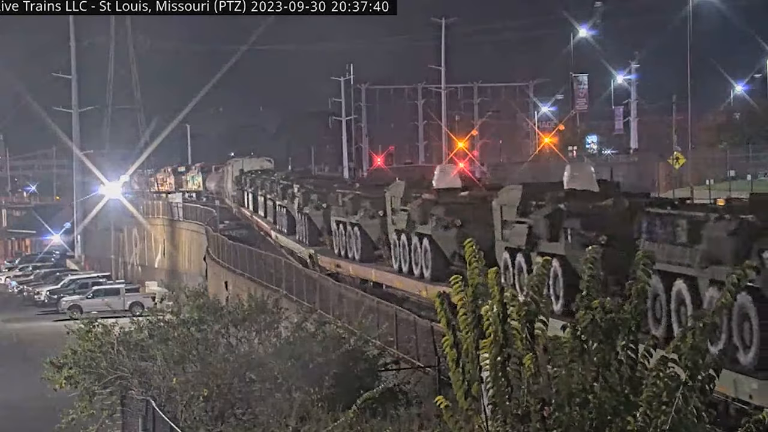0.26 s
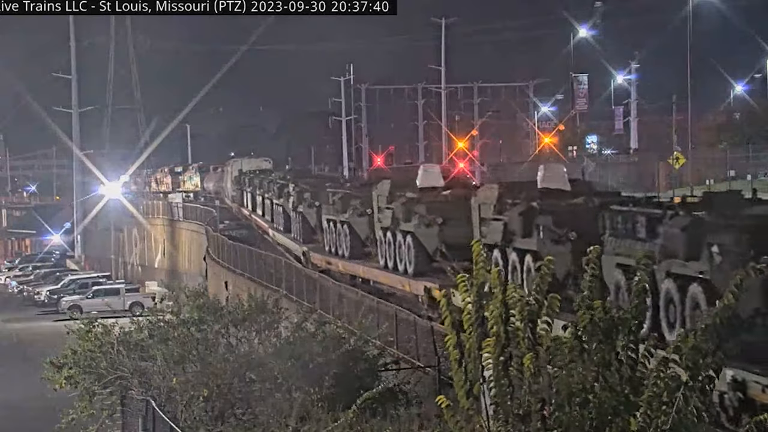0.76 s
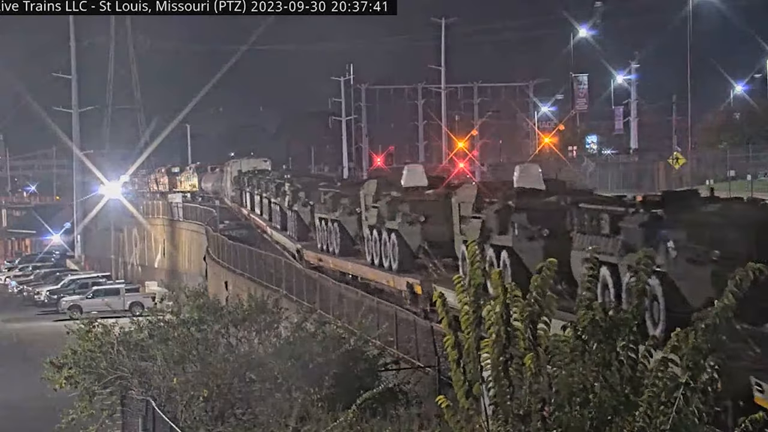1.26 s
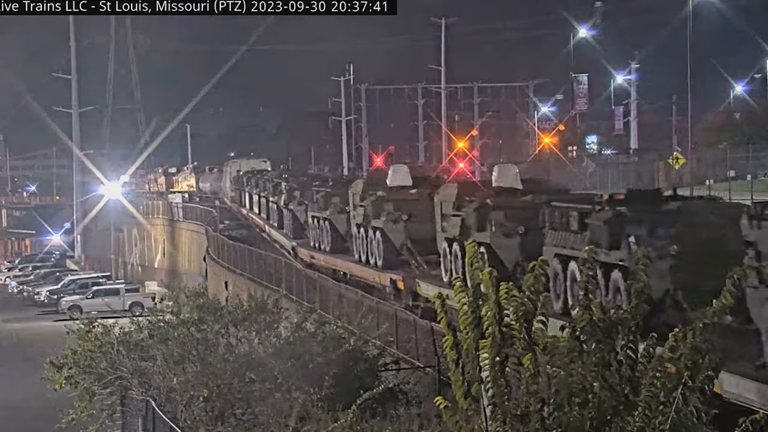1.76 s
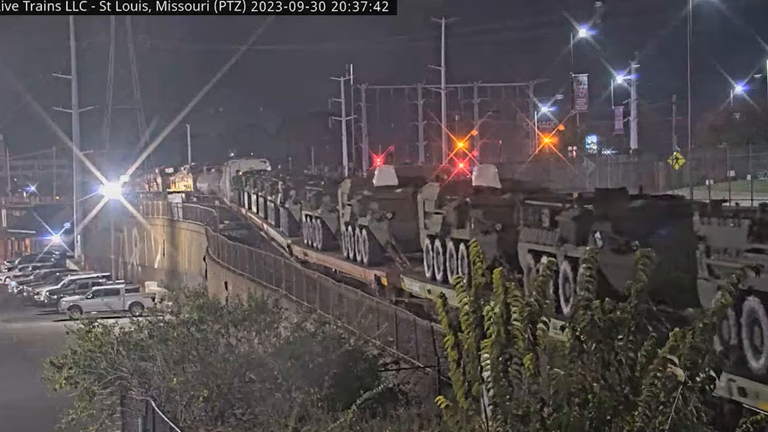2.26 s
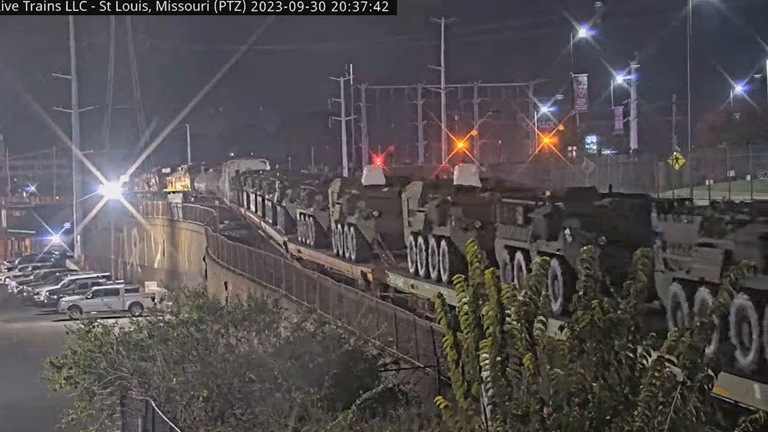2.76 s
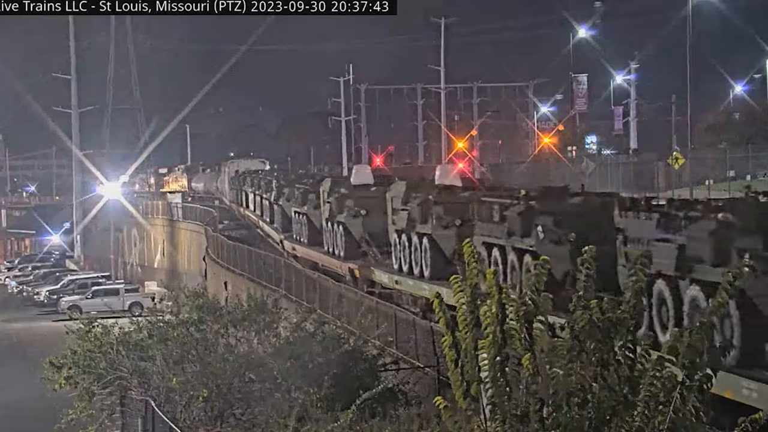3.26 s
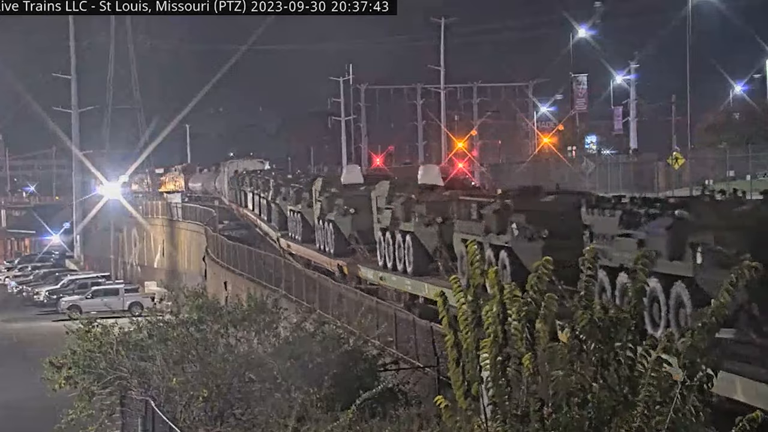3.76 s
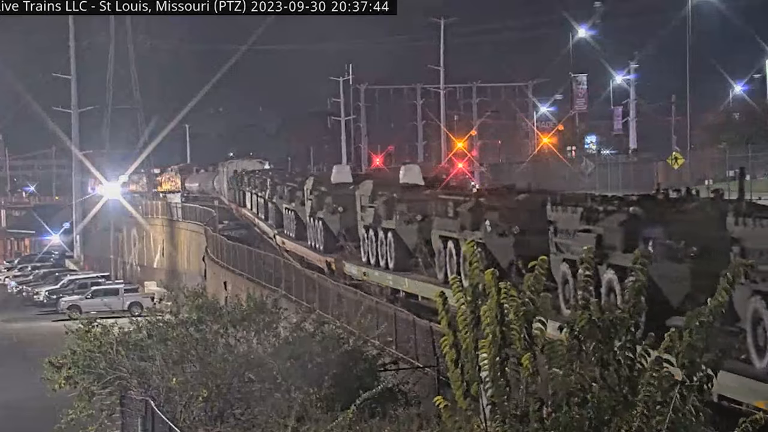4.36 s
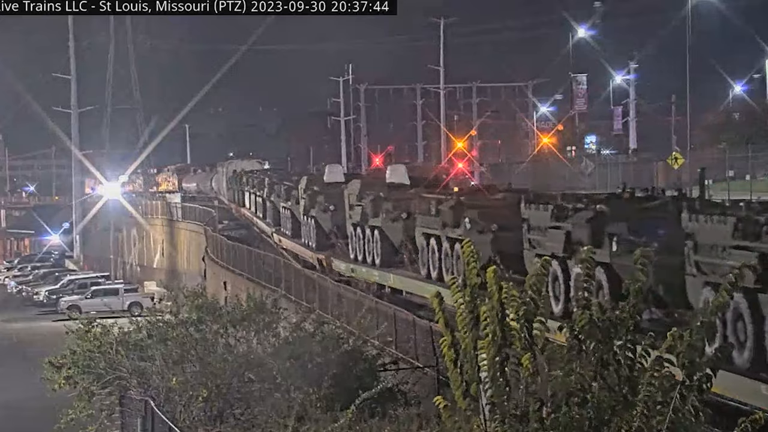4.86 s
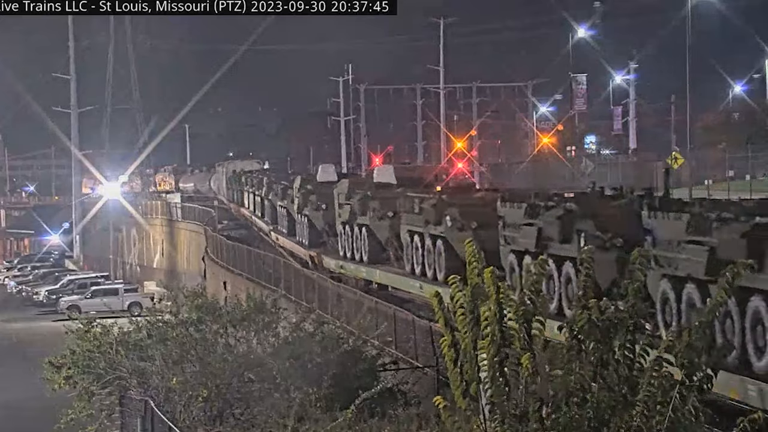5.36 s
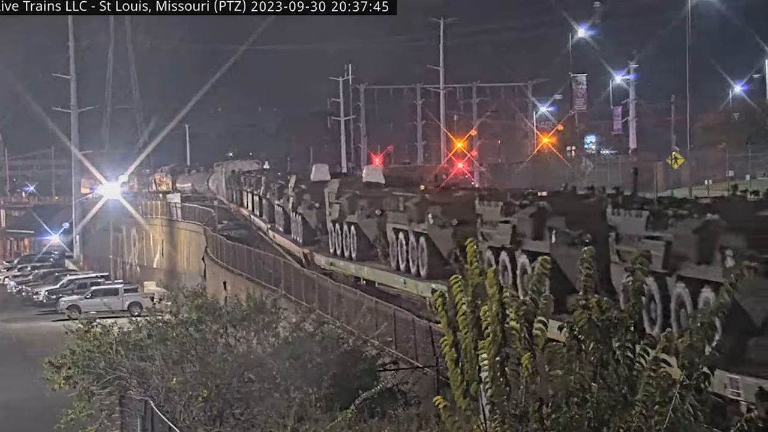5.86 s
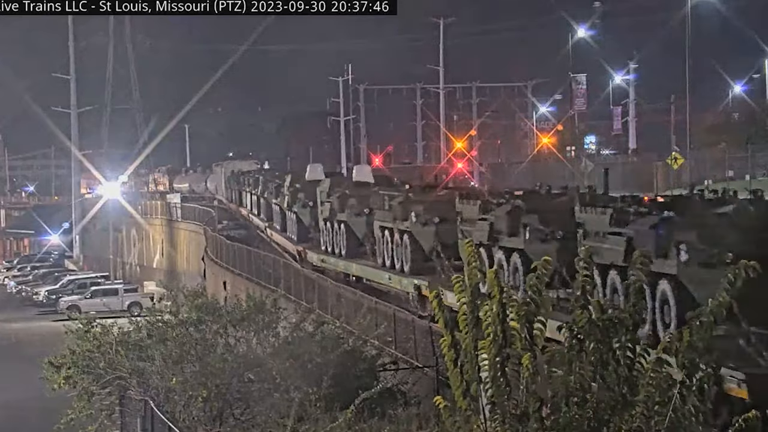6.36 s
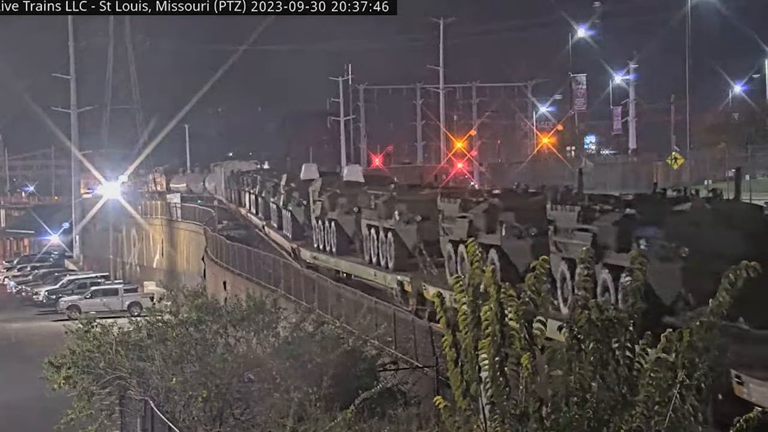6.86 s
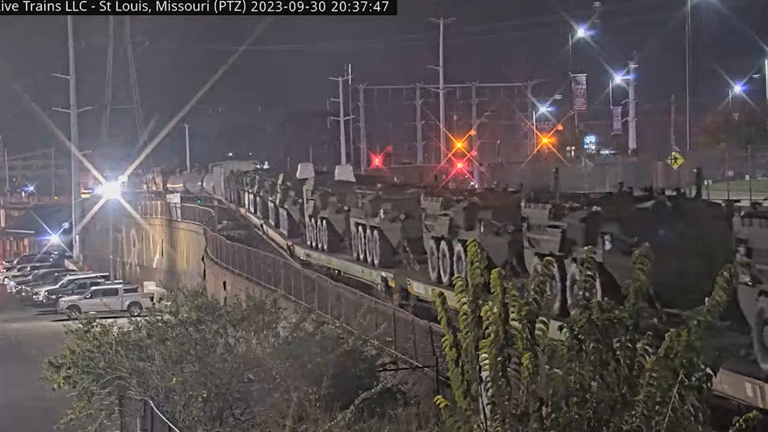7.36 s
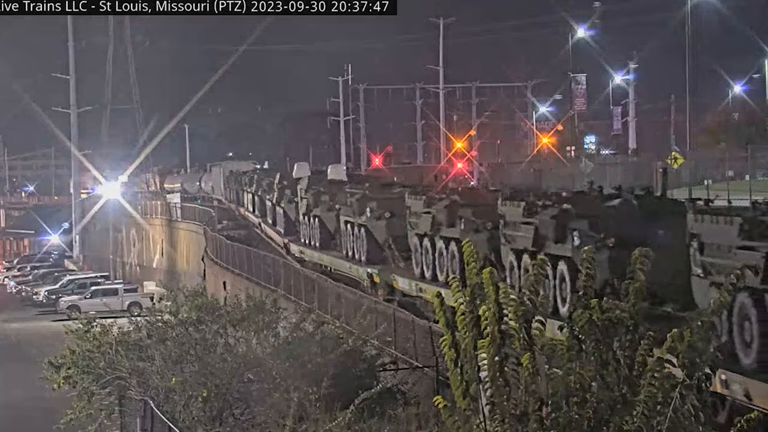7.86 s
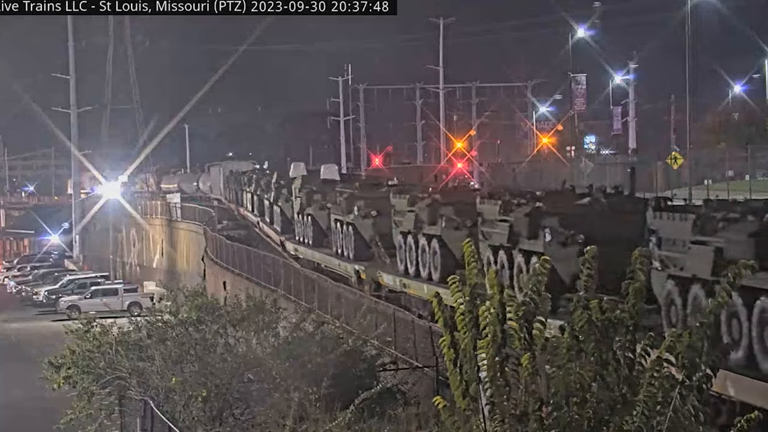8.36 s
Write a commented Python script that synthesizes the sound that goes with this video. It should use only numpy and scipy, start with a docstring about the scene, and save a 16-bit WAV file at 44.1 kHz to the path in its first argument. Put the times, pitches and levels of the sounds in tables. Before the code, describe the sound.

A passing freight train's wheels screech in several high, wavering tones, with steel grinding and low rumble, until the squeal dies away.

```python
"""On a railway curve at night, a long freight train of loaded flatcars rolls past a distant microphone.
Many wheels squeal at once, each ringing with its own notes, while their flanges (the lips that keep
them on the track) scrape the rail. Below lie the rumble of rolling and a few knocks from the cars.
Near the end the flanges press less hard, and the squeal and scrape die away."""
import sys
import numpy as np
from scipy import signal
from scipy.fft import rfft, irfft, next_fast_len
from scipy.io import wavfile
from scipy.ndimage import uniform_filter1d

SR = 44100
rng = np.random.default_rng(int(sys.argv[2]) if len(sys.argv) > 2 else 0)


def bounce(signal):
    """Save signal as a 16-bit WAV file at the path given by the first command-line argument."""
    frames = np.transpose(np.atleast_2d(signal))
    limited = np.clip(frames, -1, 1)
    pcm = np.round(limited * 32767).astype(np.int16)
    wavfile.write(sys.argv[1], SR, pcm)


N = 380122
TIME, FREQS = np.arange(N) / SR, np.fft.rfftfreq(N, 1 / SR)


def amp(db):
    """Turns decibels into a gain to multiply by."""
    return 10 ** (np.asarray(db) / 20)


def evened(x):
    """Scales a signal to an average power of one."""
    return x / np.sqrt(np.mean(x ** 2) + 1e-20)


def ringing(modes):
    """Gain at every frequency for a body with these modes (the notes it likes to ring at)."""
    power = sum(amp(db) ** 2 / (1 + 2 * ((FREQS - hz) / width) ** 2) ** 2 for hz, width, db in modes)
    return np.sqrt(power)


def noise(gain):
    """Random vibration, shaped by a gain for every frequency."""
    size = next_fast_len(N)
    shape = np.interp(np.fft.rfftfreq(size, 1 / SR), FREQS, gain)
    return evened(irfft(rfft(rng.standard_normal(size)) * shape, size)[:N])


def drift(per_s, count=2048):
    """A smooth random wobble, about one in size, that swings up to about per_s times a second."""
    hz = np.fft.rfftfreq(count, TIME[-1] / count)
    slow = irfft(rfft(rng.standard_normal(count)) / (1 + (hz / per_s) ** 4))
    return np.interp(TIME, np.linspace(0, TIME[-1], count), evened(slow))


def swell(start, length, edge_s):
    """Rises from 0 to 1 around the start, holds, and falls back around the end."""
    return np.clip(.5 + np.minimum(TIME - start, start + length - TIME) / edge_s, 0, 1)


def echoes(x, fade_s, echo_db):
    """Walls and cars scatter the sound into echoes that fall by 60 dB in fade_s."""
    taps = rng.choice([-1., 1.], SR) * (rng.random(SR) < 1 / 20)
    taps *= amp(-60 * TIME[:SR] / fade_s)
    tail = signal.oaconvolve(x, taps / np.linalg.norm(taps))[:N]
    return (x + amp(echo_db) * tail) / np.hypot(1, amp(echo_db))


def flange_push(db, follow, db_per_s):
    """Gain of a sound that follows the flanges' push on the rail and shifts steadily with time."""
    # how hard the flanges press in the curve: t/s, force/dB
    push = [(0, -3), (0.35, -1), (0.7, -3.5), (1.25, -6), (1.9, -6.5), (2.45, -9), (2.8, -7.0), (3.7, -8),
            (4.05, -11), (4.7, -12), (5.6, -10.5), (6.8, -9.5), (7.3, -11.0), (7.8, -17), (8.1, -22.5),
            (8.62, -27)]
    # a flange bites and the steel briefly sounds louder: t/s, length/s, extra force/dB
    bites = [(1.367, 0.083, 2), (2.022, 0.15, 1.5), (5.944, 0.14, 3)]
    force_db = np.interp(TIME, *np.transpose(push))
    force_db += sum(extra * swell(start, length, edge_s=0.04) for start, length, extra in bites)
    return amp(db + follow * force_db + db_per_s * TIME)


def wheel_note(hz, spread_hz, waver=0.002017, grab_db=4.5, slip=0.49, doppler=.004, wheels=4):
    """One note on several wheels; each wavers in pitch, grabs the rail and lets go."""
    tones = np.zeros(N)
    centre = hz * (1 + doppler * (.5 - TIME / TIME[-1]))  # the pitch sinks a little as the wheels pass
    for _ in range(wheels):
        pitch = centre * (1 + waver * drift(82.5)) + spread_hz * drift(18)
        grip = amp(grab_db * drift(12))
        tones += grip * np.sin(2 * np.pi * (np.cumsum(pitch) / SR + rng.random()))
    note = evened(echoes(tones, fade_s=0.6, echo_db=0.5))
    note += slip * noise(ringing([(hz, 3.3 * spread_hz, 0)]))  # sliding rings the same note loosely
    power = uniform_filter1d(note ** 2, size=4500)
    return note / np.sqrt(power + 1e-12)  # the wheels share one drive, so their total stays steady


def squeal(follow=0.97):
    """The wheels ring louder the harder the flanges press, and single notes flare up."""
    # the wheels' notes: f/Hz, spread among wheels/Hz, base level/dB, change/(dB/s)
    notes = [(2771, 13.86, -34, -1.4), (3540, 22, -45.5, -1.0), (4455, 30, -33.5, 0.11),
             (5358, 35, -24.5, -0.39), (6277, 34, -35, 0.15), (7210, 45, -41, 0.4),
             (8117, 36, -39.5, -0.68), (9055, 42, -44, -0.75), (10866, 45, -57, -0.74)]
    # a wheel locks into one note, which flares: t/s, length/s, rise and fall/s, f/Hz, boost/dB
    flares = [(0.0, 0.2, 0.12, 5358, 6.5), (0.0, 0.23, 0.05, 4458, 5), (0.0, 0.37, 0.1, 8128, 5),
              (0.2, 4.8, 0.11, 6284, 7), (0.248, 0.11, 0.026, 2775, 7), (0.404, 0.076, 0.029, 2775, 10),
              (0.33, 0.7, 0.1, 3540, 10), (0.38, 0.42, 0.082, 7225, 7), (0.4, 3.2, 0.7, 10890, 13),
              (0.85, 0.84, 0.16, 6284, 3.5), (0.85, 0.45, 0.3, 9070, 5.5), (1.25, 0.53, 0.12, 8128, 5),
              (2.253, 0.12, 0.06, 2775, 5.5), (2.3, 0.41, 0.25, 9070, 8), (2.977, 0.16, 0.06, 2775, 3.5),
              (3.303, 0.93, 0.25, 7225, 5.5), (3.4, 0.49, 0.15, 4458, 4), (3.7, 1.4, 0.4, 9070, 8.5),
              (4.95, 0.55, 0.15, 7225, 4.5), (5.65, 1.9, 0.35, 4458, 4), (6.6, 0.35, 0.15, 8128, 3),
              (6.996, 0.095, 0.06, 4458, 8.5)]
    pitches = np.transpose(notes)[0]
    boosts = np.zeros((len(notes), N))
    for start, length, edge_s, hz, db in flares:
        nearest = np.argmin(abs(pitches - hz))
        boosts[nearest] += db * swell(start, length, edge_s)
    return sum(flange_push(db + boost, follow, db_per_s) * wheel_note(hz, spread)
               for (hz, spread, db, db_per_s), boost in zip(notes, boosts))


def rub(loudness, modes, patchy_db=1.2):
    """Sliding steel rings a set of modes, in two groups that swell and fade separately."""
    groups = ringing(modes[::2]), ringing(modes[1::2])
    rubbing = sum(np.linalg.norm(gain) * noise(gain) * amp(patchy_db * drift(13.7)) for gain in groups)
    return flange_push(*loudness) * evened(rubbing)


def scrape(next_car_s=4.87, rise_s=0.099, judder_db=0.24):
    """Flanges, rail and grit grind together, joined later by the next car; one shaky grip moves all."""
    # loudness of each part: base level/dB, dB per dB of force, change/(dB/s)
    flange = (-22, 0.95, 0.02)  # flange against the top of the rail
    rail = (-33.5, 0.75, 0.087)  # ringing rail and wheel frames
    grit = (-48, 0.71, -0.66)  # fine grit between wheel and rail
    next_car = (-26.5, 1.0, -0.056)  # its wheels are tuned a little differently
    # where each part rings: f/Hz, width/Hz, relative level/dB
    flange_modes = [(4456, 160, 0), (4720, 690, -5), (5280, 214, 3), (5544, 176, 4), (5820, 750, 0),
                    (6280, 180, -9), (6800, 260, -11.5), (7230, 400, -10.5), (7830, 220, -22),
                    (8007, 660, -17)]
    rail_modes = [(352, 174, -8.5), (705, 1120, -14), (1332, 110, -10.5), (1578, 200, -7), (1830, 128, 0.5),
                  (1996, 110, -4), (2213, 160, -0.5), (2730, 325, 3), (3090, 89, 0), (3257, 90, 3),
                  (3517, 135, 6), (3847, 240, 4), (4100, 240, -12.5)]
    grit_modes = [(9077, 2200, -1), (9800, 130, 4), (10570, 301, 0.5), (11650, 306, 1), (12566, 190, -13),
                  (13683, 584, -18)]
    next_car_modes = [(955, 53, -17), (2213, 54, -6.5), (2600, 140, -4.5), (5540, 82, 4.5),
                      (6220, 120, -3.5), (6390, 126, 5), (6950, 44, -3.5), (7310, 170, -5),
                      (8330, 150, -18), (10300, 2900, -30.5), (11900, 343, -32)]
    steel = rub(flange, flange_modes) + rub(rail, rail_modes) + rub(grit, grit_modes)
    arrival = np.clip((TIME - next_car_s) / rise_s, 0, 1)
    steel += arrival * rub(next_car, next_car_modes)
    return steel * amp(judder_db * drift(40))


def moving_echoes(x, places=14):
    """The echo paths keep changing as the cars move along, each fading into the next."""
    times = np.linspace(0, TIME[-1], places)
    fades = (np.interp(TIME, times, here) for here in np.eye(places))
    return sum(echoes(x * fade, fade_s=0.18, echo_db=-7) for fade in fades)


def rumble(lumpy_db=0.83):
    """Heavy wheels roll over uneven rail."""
    # loudness from the weight of the rolling cars: t/s, level/dB
    weight = [(0.0, -39), (1.3, -40), (2.3, -42.5), (4.4, -41), (6.2, -44), (8.62, -43)]
    # the rumble's deep tone: f/Hz, relative level/dB
    tone = [(15, -3), (30, -2), (40, -2), (52, 3), (75, -4), (115, -6.5), (150, -11.5), (230, -18.5),
            (350, -21.5), (600, -27.5), (980, -26), (1200, -31.5), (1600, -29.5), (12000, -55)]
    hz, db = np.transpose(tone)
    spectrum = amp(np.interp(np.log(FREQS + 1), np.log(hz), db))
    level_db = np.interp(TIME, *np.transpose(weight)) + lumpy_db * drift(14.0)
    return amp(level_db) * noise(spectrum)


def knocks(rise_s=0.0012, decay_s=0.041, boost_db=1):
    """Each blow sets off a short ring of steel, a thud of the car's deck and a thin clatter."""
    # couplers and decks knock: t/s, level before the boost/dB, f/Hz
    blows = [(2.57, -45.5, 1120), (4.145, -54, 400), (4.36, -49.5, 1060), (4.61, -51, 348),
             (4.915, -47, 398), (5.333, -51, 450), (5.534, -51, 520), (5.60, -47, 635), (6.02, -50, 1000),
             (6.33, -39, 340), (6.457, -50, 392), (6.59, -48.5, 610), (7.086, -49, 1030),
             (7.734, -46.5, 370), (8.369, -45.5, 343)]
    out = np.zeros(N)
    for start, db, hz in blows:
        age = np.maximum(TIME - start, 0)
        strength = amp(db + boost_db) * (1 - np.exp(-age / rise_s)) * np.exp(-age / decay_s)
        steel, thud, clatter = (hz, 300, 0), (200, 100, -3), (2 * hz, 600, -13)  # f/Hz, width/Hz, dB
        out += strength * noise(ringing([steel, thud, clatter]))
    return out


def scene():
    """All the train's sounds reach one microphone, which feeds both channels."""
    train = squeal() + moving_echoes(scrape()) + rumble() + knocks()
    return np.array([train, train])


def record(dry, cutoff_hz=15100):
    """Cuts away the very highest treble."""
    lowpass = signal.firwin(511, cutoff_hz, window=("kaiser", 9), fs=SR)
    return signal.oaconvolve(dry, lowpass[None], "same")


dry = scene()
out = record(dry)
bounce(out)
```